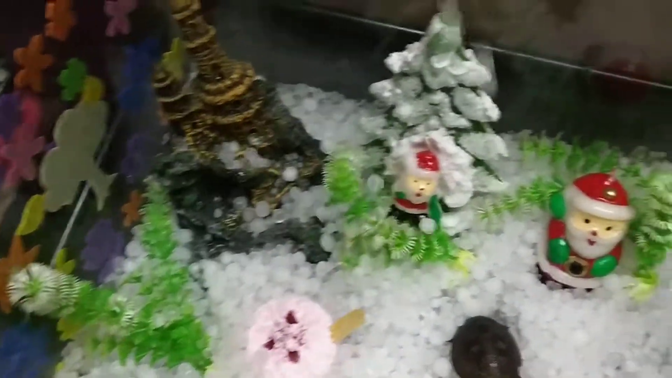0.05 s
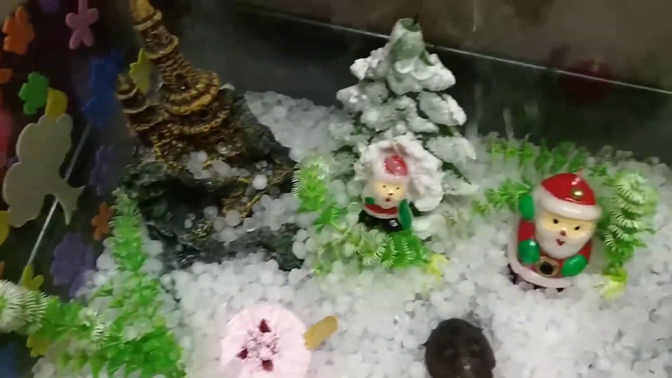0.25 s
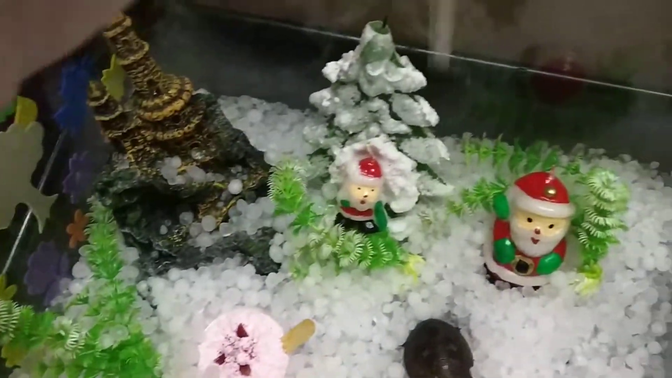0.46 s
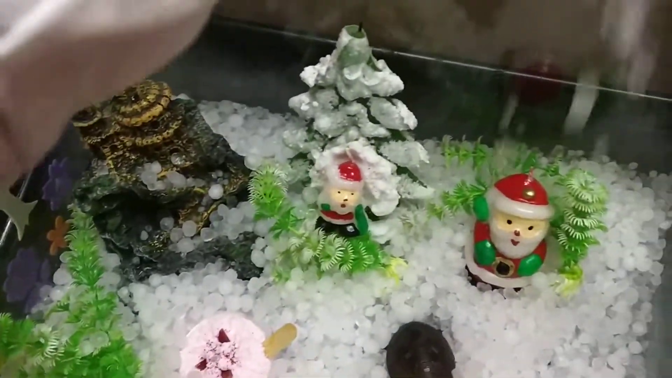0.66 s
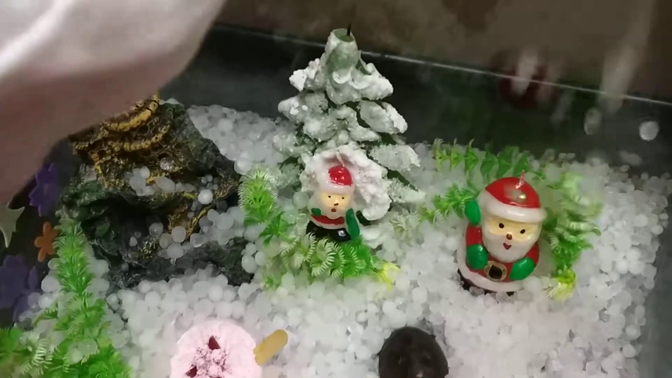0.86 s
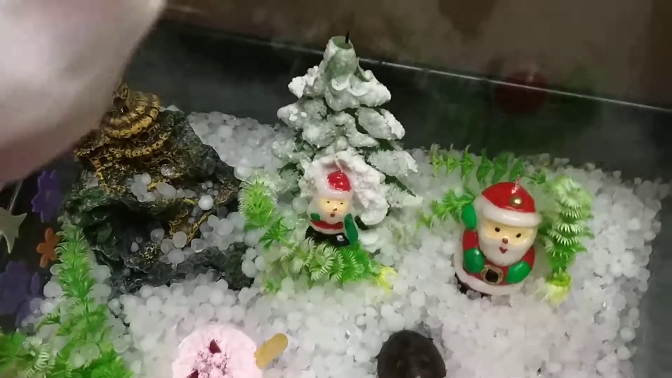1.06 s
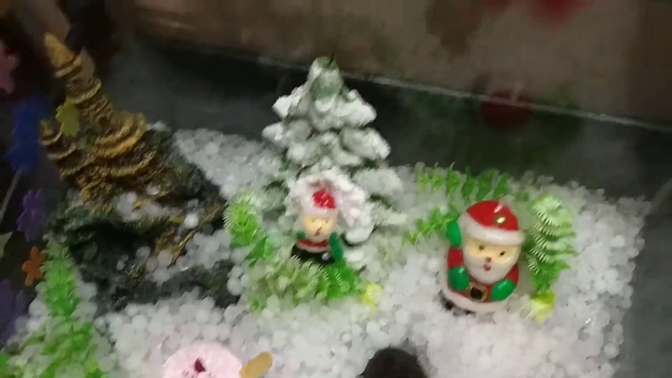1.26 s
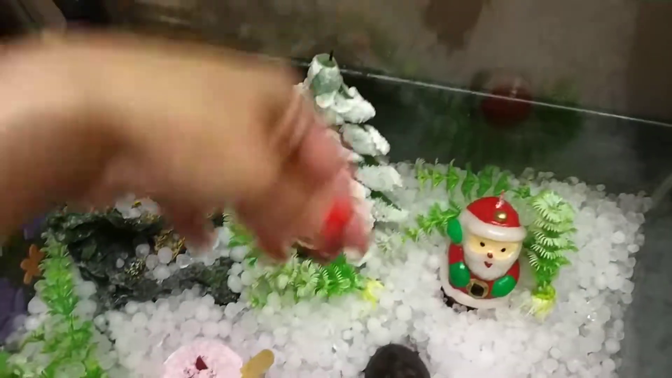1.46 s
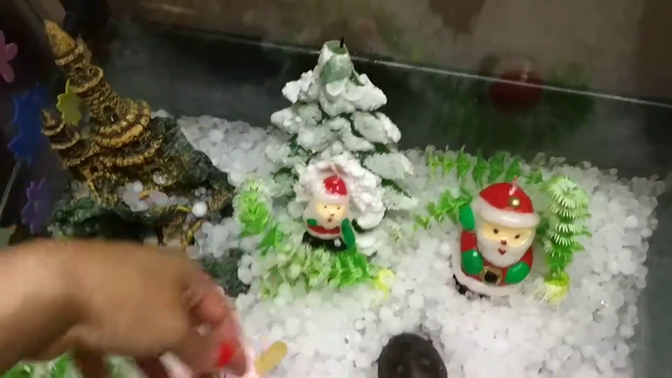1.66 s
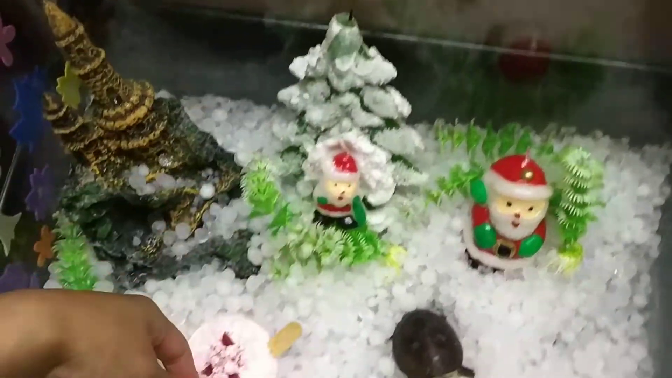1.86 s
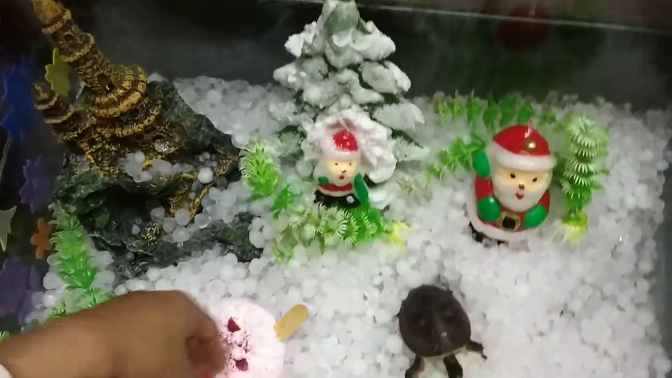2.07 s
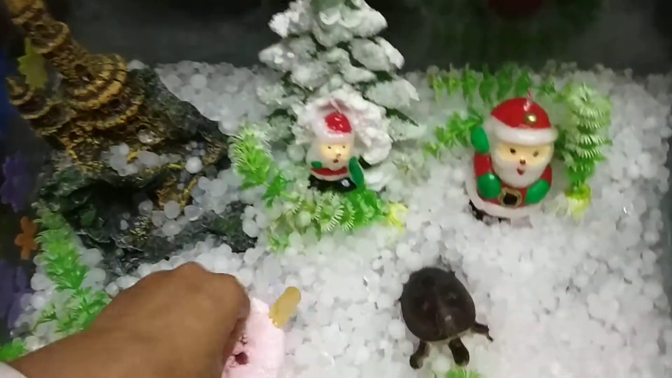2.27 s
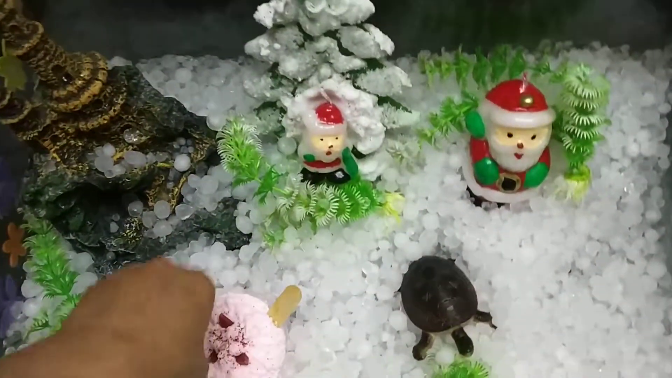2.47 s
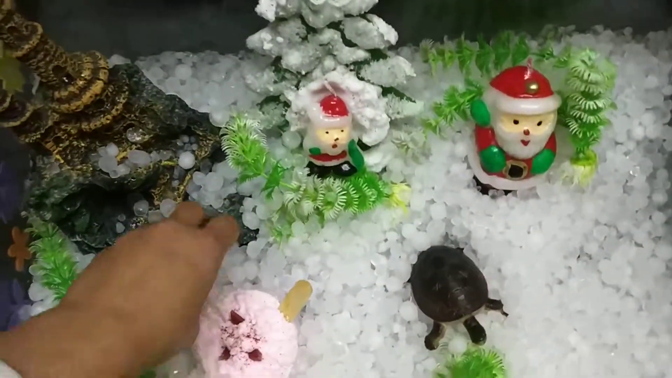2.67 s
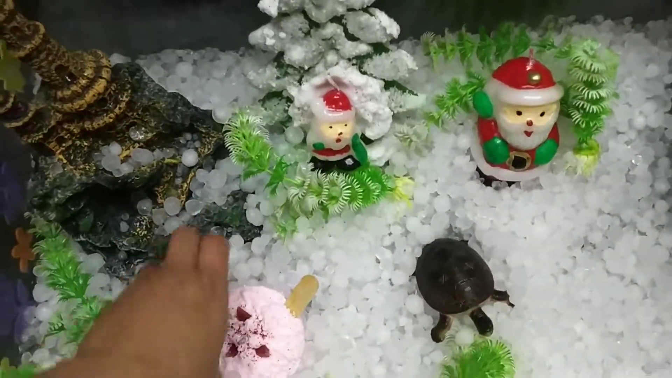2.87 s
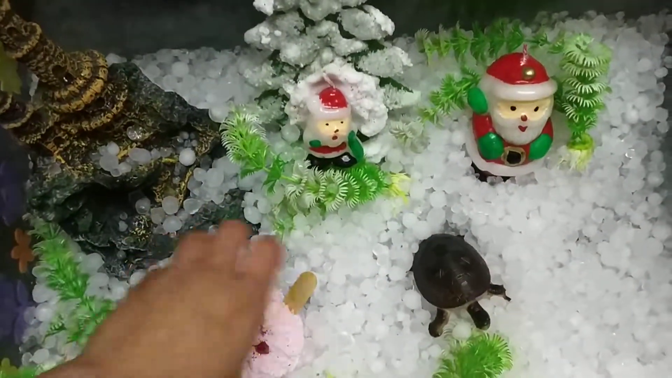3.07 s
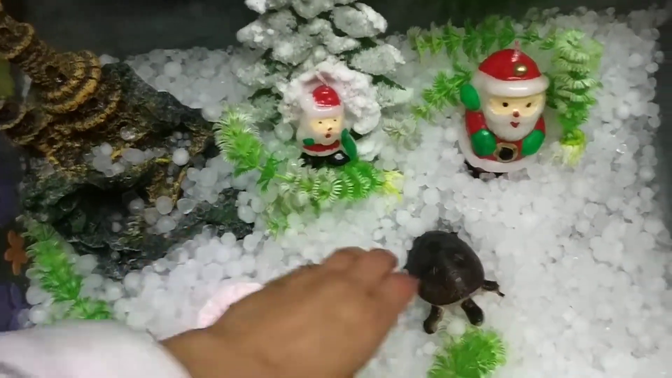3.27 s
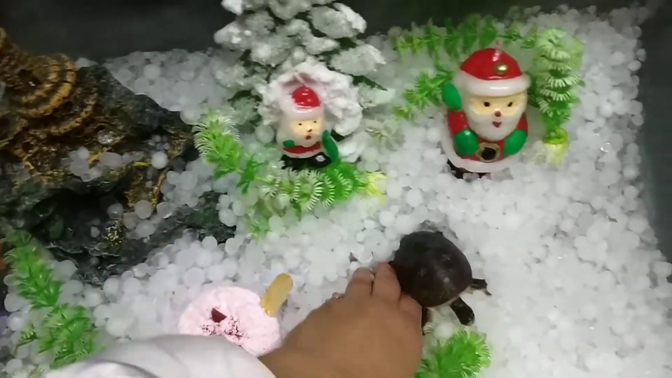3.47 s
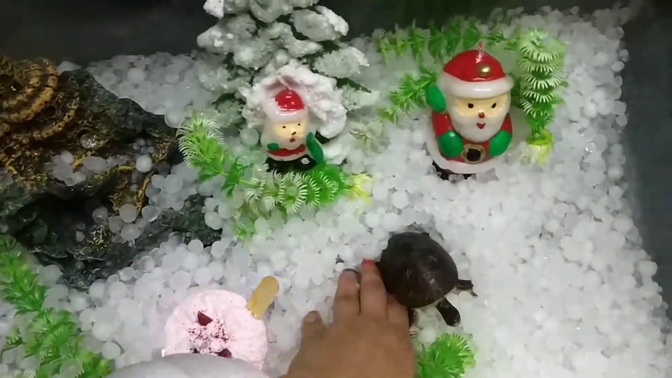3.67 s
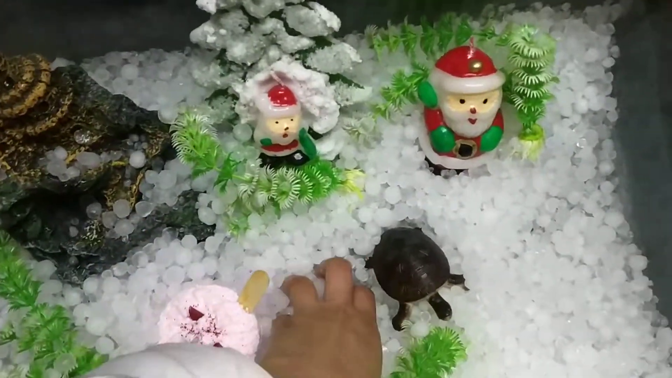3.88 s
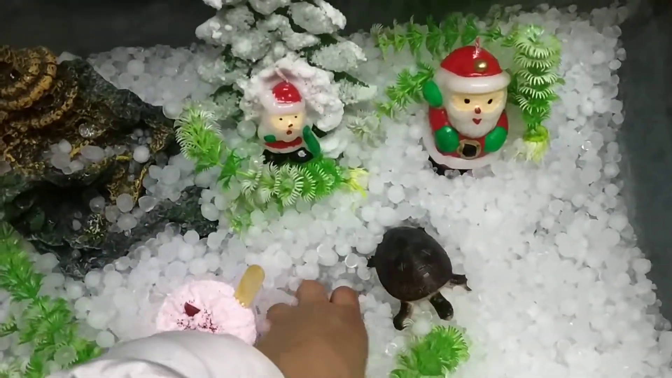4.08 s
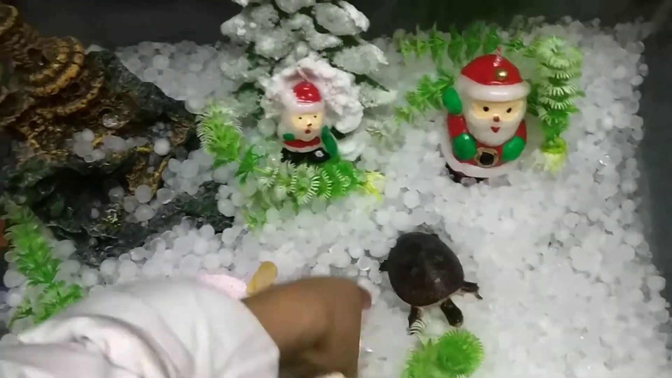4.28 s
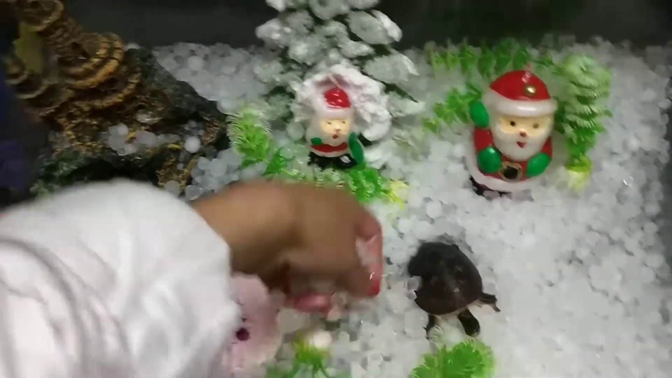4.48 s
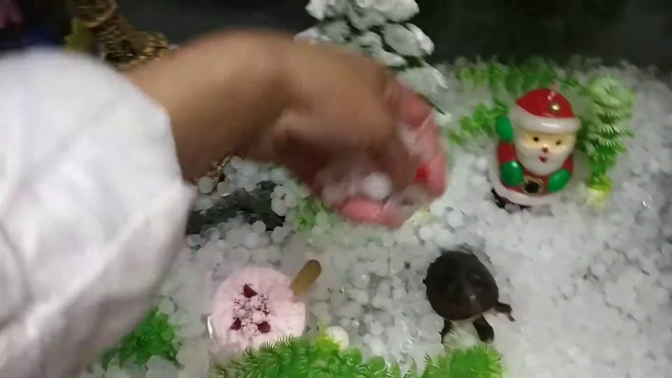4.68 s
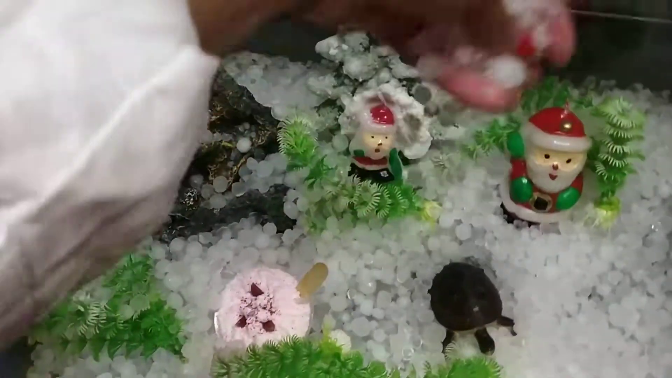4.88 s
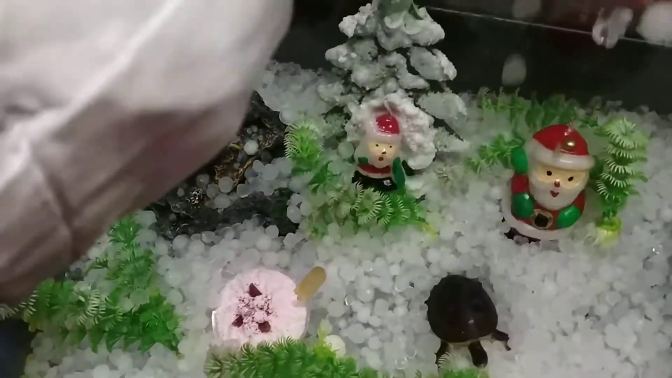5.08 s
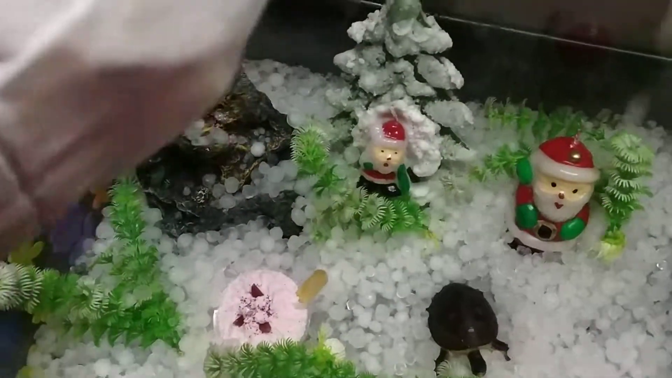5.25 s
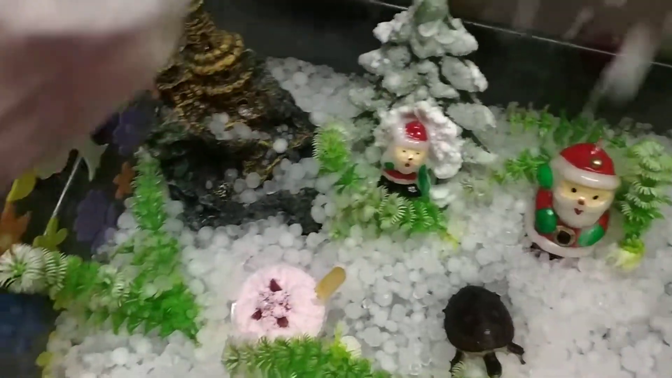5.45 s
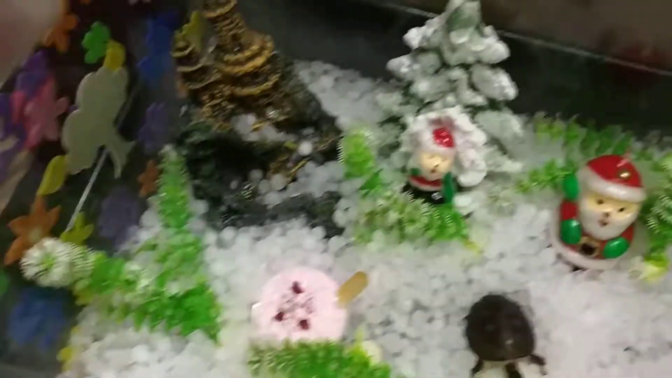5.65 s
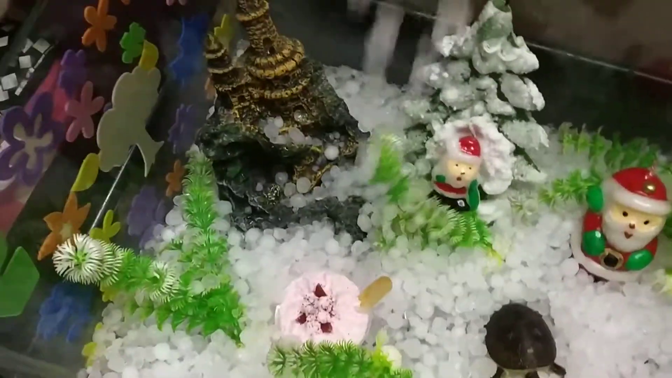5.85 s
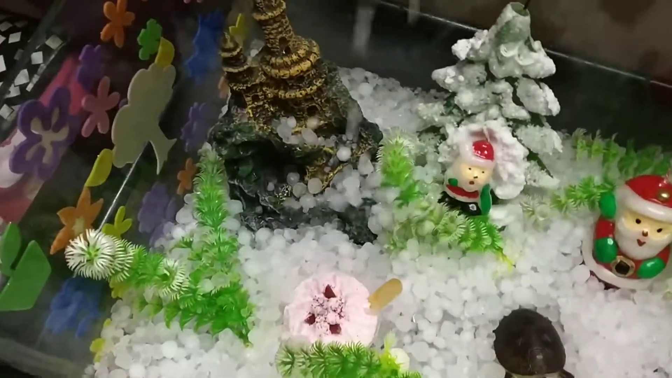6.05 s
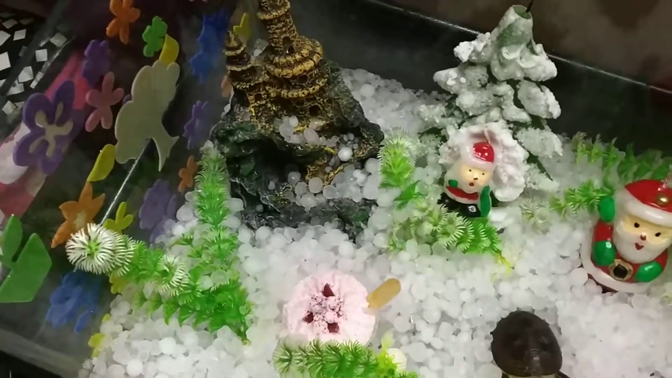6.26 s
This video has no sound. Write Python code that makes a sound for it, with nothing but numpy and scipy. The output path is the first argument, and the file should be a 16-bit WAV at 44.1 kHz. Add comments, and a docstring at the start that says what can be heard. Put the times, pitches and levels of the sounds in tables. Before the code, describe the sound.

A hand drops ice-like pellets over a heap with hard ornaments in a tank. Sharp ticks, tiny rattles and a brief ringing clink come first, then sparse clicks and a quiet gap over low rumbling air. Next comes a thick gritty scoop, followed by a lively shower of pellets with dull knocks. The sound is close, bright, stereo leaning left, with short glassy reflections and a small room around.

```python
"""Hailstones in a glass tank indoors: a hand scoops them up and lets them trickle back onto the pile.
Single pellets are short noise cracks with brief rings, heard through the ice and the tank's resonances.
The pushed pile crunches as countless random noise grains and tiny rings; the tank floor thuds and rings.
One blow on a hard ornament sets decaying sines ringing in a high ping.
The glass walls echo closely, and a low rumble of filtered noise fills the room."""
import sys
import numpy as np
from scipy import signal
from scipy.fft import rfft, irfft, next_fast_len
from scipy.io import wavfile
from scipy.ndimage import uniform_filter1d, map_coordinates

SR = 44100
rng = np.random.default_rng(int(sys.argv[2]) if len(sys.argv) > 2 else 0)


def wav_out(sig):
    """Save sig, one row per channel (or a flat mono array), as 16-bit PCM at SR to the path in sys.argv[1]."""
    wavfile.write(sys.argv[1], SR, np.round(np.clip(np.atleast_2d(sig).T, -1, 1) * 32767).astype(np.int16))


N = 278712
TOP_HZ = 16000  # upper limit of the sound


def amp(db):
    """Decibels to gain."""
    return 10 ** (np.asarray(db) / 20)


def unit(x):
    """Scale to rms 1."""
    return x / np.sqrt(np.mean(x ** 2) + 1e-20)


def along(points, hz):
    """Read (Hz, value) points on a log frequency axis."""
    f, v = np.transpose(points)
    return np.interp(np.log(hz + 1), np.log(f + 1), v)


def curves(rows):
    """One value per sample for each column after the time."""
    times, *columns = np.transpose(rows)
    return [np.interp(np.arange(N) / SR, times, column) for column in columns]


def wobble(rate):
    """A smooth random curve with rate knots a second."""
    knots = rng.standard_normal(int(N * rate / SR) + 4)
    return map_coordinates(knots, [np.arange(N) * rate / SR])


def slope(points):
    """Gain against frequency from (Hz, dB) points."""
    return lambda hz: amp(along(points, hz))


def peaks(modes):
    """Gain against frequency of resonances (Hz, width Hz, dB) that add in power."""
    def gain(hz):
        power = 0
        for center, width, db in modes:
            damping = (hz * width) ** 2
            power = power + amp(db) ** 2 * damping / ((center ** 2 - hz ** 2) ** 2 + damping)
        return np.sqrt(power)
    return gain


def colour(x, gain):
    """Causal minimum-phase filter that keeps the power of white noise."""
    m = 2 * next_fast_len((N + SR // 4) // 2)
    response = unit(gain(np.fft.rfftfreq(m, 1 / SR)))
    cepstrum = irfft(np.log(np.maximum(response, 1e-6)))
    # folding the cepstrum forward in time makes the filter causal
    cepstrum[1:m // 2] *= 2
    cepstrum[m // 2 + 1:] = 0
    return irfft(rfft(x, m) * np.exp(rfft(cepstrum)), m)[..., :N]


def pan(db):
    """Left and right gains of mean power 1, the left higher by db."""
    return unit(amp([[db / 2], [-db / 2]]))


def blend(pair, alike):
    """Turn two unrelated channels into partly alike ones."""
    turn = np.arccos(np.clip(alike, -1, 1)) / 2
    return np.cos(turn) * pair[0] + np.sin(turn) * np.array([pair[1], -pair[1]])


def add(track, s, sound):
    """Mix a sound into a track at time s."""
    start = int(np.clip(round(s * SR), 0, N - 1))
    track[:, start:start + sound.shape[1]] += sound[:, :N - start]


# swell of the background, shared by drone, rush and hiss: (t/s, level/dB)
RUMBLE_SWELL = [(0, -33.5), (.25, -32), (.7, -33), (1.1, -36.5), (1.5, -31.5), (1.8, -31.5), (2.2, -32.5),
                (2.4, -35.5), (2.6, -35.5), (3.05, -38.5), (3.4, -47.5), (4.8, -52.5), (6.3, -54.5)]
# level of a higher band of the rumble: (t/s, level/dB)
UPPER_SWELL = [(0, -44), (.2, -47.5), (.5, -64), (1.2, -65), (1.5, -49), (1.9, -42.5), (2.3, -55),
               (3.2, -78)]
# that band's resonance: (f/Hz, width/Hz, level/dB)
UPPER_RESONANCE = [(357, 115, 0)]
# spectrum of the low drone: (f/Hz, relative level/dB)
DRONE_COLOUR = [(20, -81), (45, -51), (80, -32), (100, -18), (120, -11.5), (190, -4.5), (235, 1.5),
                (290, -6), (325, -10.5), (395, -5), (450, -21.5), (540, -8.5), (700, -26), (1500, -50)]
# standing waves of the room: (f/Hz, width/Hz, relative level/dB)
STANDING_WAVES = [(153.3, 7.5, -3), (218.4, 6, -1.5), (237.4, 6, 1), (279, 15, -0.5), (376, 43, -41)]
# spectrum of a dull rush: (f/Hz, relative level/dB)
RUSH_COLOUR = [(410, -22), (700, -6.5), (970, 3), (1280, -18.5), (1700, -13), (2210, -35), (3740, -120)]
# spectrum of a faint hiss: (f/Hz, relative level/dB)
HISS_COLOUR = [(1180, -11), (2000, -5.5), (3800, -0.5), (4250, -6.5), (4550, -8), (7290, -2.5),
               (15500, -19)]
# spectrum of the steady room tone: (f/Hz, relative level/dB)
ROOM_TONE_COLOUR = [(25, -44), (64, -17.5), (92, -21), (130, -1.5), (155, -13), (172, 5), (215, -9),
                    (300, -3), (450, -3.5), (900, -13.5), (2000, -23)]
HISS_DB, RUSH_DB, HISS_SIDE_DB = -9.5, -26.5, 6  # against the swell; left over right


def rumble():
    """A low, hissing noise swells and fades over steady room tone, ringing the room's standing waves."""
    level_db, = curves(RUMBLE_SWELL)
    upper_db, = curves(UPPER_SWELL)

    def air(gain):
        return colour(blend(rng.standard_normal((2, N)), 0.85), gain)

    def drone(hz):
        return np.hypot(unit(slope(DRONE_COLOUR)(hz)), amp(-2.5) * unit(peaks(STANDING_WAVES)(hz) ** 2))

    swell = amp(-6.5) * air(drone) + amp(RUSH_DB) * air(slope(RUSH_COLOUR))
    hiss = amp(HISS_DB) * pan(HISS_SIDE_DB) * colour(rng.standard_normal((2, N)), slope(HISS_COLOUR))
    upper = amp(upper_db) * air(lambda hz: peaks(UPPER_RESONANCE)(hz) ** 2)
    room_tone = amp(-52.5) * air(slope(ROOM_TONE_COLOUR))
    return amp(level_db) * (swell + hiss) + upper + room_tone


SLIDE_RISE_S, SETTLE_DB_PER_S = .024, 220


def motion(t, start, end):
    """The pile gives way quickly, keeps moving until the end, then settles; a gain."""
    rise = np.clip((t - start) / SLIDE_RISE_S + .5, 0, 1)
    return rise * amp(-SETTLE_DB_PER_S * np.maximum(t - end, 0))


# short slides of the pile, under the fingers or the falling pellets:
# (t/s, length/s, fine crunch level/dB, coarse crunch level/dB, tank level/dB, swell/dB per s)
PILE_SLIDES = [(0, 0.082, -36, -40.5, -49.5, 3.5), (0.13, 0.07, -36, -40.5, -52, -24),
               (0.274, 0.084, -25, -31.5, -48, -75), (0.368, 0.07, -31.5, -37.5, -52, -26),
               (0.452, 0.24, -37.5, -44, -69, -42), (0.708, 0.11, -33.5, -40, -52, -16.5),
               (.912, 0.07, -38, -43, -57, 21), (1.02, .06, -35, -41.5, -54, 0),
               (1.135, .12, -34, -44.5, -55, 0), (1.356, 0.057, -33, -42, -55, -120),
               (1.494, 0.014, -31.5, -53, -55, -13.5), (1.622, 0.02, -36.5, -49, -60, -6.5),
               (2.093, 0.14, -48.5, -61, -62, 41), (2.244, 0.054, -33.5, -45, -57, 120.5),
               (2.35, 0.11, -35, -43.5, -52.5, -47), (2.481, 0.082, -45.5, -45.5, -57, -2),
               (2.593, .11, -31, -39.5, -48, -30), (2.787, 0.014, -38, -45.5, -55, -11),
               (2.879, 0.095, -36, -44.5, -49, -23), (3.182, 0.24, -48, -53, -62, 52.5),
               (3.439, 0.021, -23, -34.5, -44.5, -3), (3.498, 0.18, -33, -43, -47.5, -29.5),
               (4.801, 0.067, -42.5, -47.5, -60, 2), (4.875, 0.039, -30, -38, -58.5, -13),
               (4.958, 0.082, -38, -46, -68.5, 5.5), (5.035, 0.16, -33.5, -43, -60, -52.5),
               (5.236, 0.054, -34, -41.5, -54.5, -2), (5.35, 0.038, -35.5, -43, -55, 2),
               (5.427, 0.086, -33, -44.5, -51.5, -20), (5.538, 0.046, -34.5, -45.5, -53, 0),
               (5.611, 0.12, -27.5, -38.5, -50.5, -56.5), (5.749, 0.1, -36.5, -43, -56, -18.5),
               (5.891, 0.11, -33, -43, -51, 31.5), (6.018, 0.048, -27, -33, -45.5, -31),
               (6.094, 0.14, -33, -43, -50.5, -12), (6.257, 0.046, -31, -37, -49.5, -100)]
# the hand digs in and closes on a handful: (t/s, fine crunch level/dB, coarse crunch level/dB)
HAND_SCOOP = [(3.72, -43.5, -46), (3.749, -35, -42.5), (3.765, -22, -39), (3.83, -22, -38),
              (3.87, -26.5, -39), (3.965, -24, -36), (4.01, -18, -30), (4.09, -23, -29.5), (4.12, -19, -28),
              (4.22, -21.5, -28.5), (4.299, -27, -37), (4.34, -23.5, -37), (4.5, -25.5, -37),
              (4.58, -23.5, -36), (4.651, -33, -45), (4.73, -30.5, -41), (4.802, -40, -49.5)]
SCOOP_TANK_DB, SCOOP_THUD_DB = -11.5, -9.5  # tank walls and floor against the coarse crunch
THUD_DB = -1  # in a slide, the tank floor against its walls
# around each landing, smaller pellets arrive just before and the heap stirs just after
STIR_DB, STIR_LEAD_S, STIR_LIFE_S = -20.5, .006, .007
STEP_S = .001  # time grid of the levels


def stirring():
    """Levels in dB of fine crunch, coarse crunch, tank walls and floor: all causes add in power."""
    t = np.arange(0, N / SR, STEP_S)
    times, *columns = np.transpose(HAND_SCOOP)
    fine_db, coarse_db = (np.interp(t, times, column) for column in columns)
    scoop = amp([fine_db, coarse_db, coarse_db + SCOOP_TANK_DB, coarse_db + SCOOP_THUD_DB])
    power = (scoop * motion(t, times[0], times[-1])) ** 2
    for start, length, fine_db, coarse_db, tank_db, swell in PILE_SLIDES:
        shape = motion(t, start, start + length) * amp(swell * np.clip(t - start, 0, length))
        power += np.outer(amp([fine_db, coarse_db, tank_db, tank_db + THUD_DB]), shape) ** 2
    # landings stir everything but the floor
    for s, tick_db, clack_db, knock_db, _ in LANDINGS:
        distance = np.maximum((s - t) / STIR_LEAD_S, (t - s) / STIR_LIFE_S)
        shape = amp(STIR_DB) * np.exp(-distance)
        power[:-1] += np.outer(amp([tick_db, clack_db, knock_db]), shape) ** 2
    levels_db = 10 * np.log10(power + 1e-12)
    return curves(np.column_stack([t, *levels_db]))


def grains(rate, spread_db, life, smooth):
    """Countless tiny slips at a rate a second, blurred by scattering in the heap."""
    sizes = amp(2 * spread_db * np.clip(rng.standard_normal(N), -2, 2))  # power of each slip
    slips = (rng.random(N) < rate / SR) * sizes / rate
    power = signal.lfilter([1], [1, -np.exp(-1 / (life * SR))], slips)
    share = np.clip(smooth, 0, 1)  # part of the power that is steady noise
    return np.sqrt(share + (1 - share) * power / power.mean()) * rng.standard_normal((2, N))


def rattle(rate, pitch_hz, cycles, spread_db):
    """Small pellets jostle, each ringing for a few cycles at its own pitch; rms 1."""
    start = np.flatnonzero(rng.random(N) < rate / SR)
    draws = np.clip(rng.standard_normal((len(start), 4)), -2, 2)
    pitch, size, side, phase = draws.T[:, :, None]
    k = np.arange(SR // 150)
    turns = np.minimum(pitch_hz * np.exp(.3 * pitch), TOP_HZ) * k / SR
    ring = amp(spread_db * size) * np.exp(-turns / cycles) / np.sqrt(rate[start, None])
    where = (start[:, None] + k).ravel()
    ears = []
    for sign in (1, -1):
        ear = ring * amp(sign * side) * np.sin(2 * np.pi * turns + sign * phase)
        ears.append(np.bincount(where, ear.ravel(), N)[:N])
    return unit(np.array(ears))


def pile(fine_db, coarse_db, tank_db):
    """The harder the pile is pushed, the more pellets slip and jostle; at rest a soft hiss remains."""
    rate = 450 * amp(.7 * (fine_db + 32)) + 300  # slips per second
    moving = np.clip((fine_db + 42) / 12, .03, 1)  # share of the power that is gritty
    crunch = grains(rate, spread_db=4, life=.0015, smooth=.5) * amp(.8 * wobble(45))
    small = rattle(rate, pitch_hz=9000, cycles=13, spread_db=4)
    large = rattle(rate, pitch_hz=3200, cycles=6, spread_db=3.5)

    def stirred(grit):
        return np.sqrt(moving) * unit(grit) + np.sqrt(1 - moving) * rng.standard_normal((2, N))

    fine = amp(fine_db) * stirred(crunch + 0.43 * small)
    coarse = amp(coarse_db) * stirred(crunch + 0.53 * large)
    tank = amp(tank_db) * stirred(crunch)
    return fine * pan(7.3), coarse * pan(6.3), tank


# small pellets spill from the hand at random: (start t/s, end t/s, typical tick level/dB)
HAND_SPILLS = [(0, .25, -39), (.3, .44, -34), (.88, 1, -40), (1.03, 1.27, -39), (2.27, 2.44, -38),
               (3.77, 4.3, -27), (4.3, 4.65, -29), (5.45, 5.7, -38), (5.9, 6.3, -38)]
SPILL_PER_S, SPILL_SPREAD_DB = 50, 2.5  # spread is a standard deviation
SPILL_CLACK_DB, SPILL_KNOCK_DB, SPILL_SIDE_DB = -13.5, -19.5, 17  # first two against the tick; left over right


def spilled():
    """Rows like those of LANDINGS for the small pellets, which fall at uneven intervals."""
    rows = []
    for start, end, db in HAND_SPILLS:
        draws = rng.random((40, 5))[:max(1, round((end - start) * SPILL_PER_S))]
        for k, (delay, *chance) in enumerate(draws):
            size, clack, knock, side = SPILL_SPREAD_DB * np.sqrt(12) * (np.array(chance) - .5)
            s = start + (k + delay) / SPILL_PER_S
            tick = db + size
            rows.append((s, tick, tick + SPILL_CLACK_DB + clack,
                         tick + SPILL_KNOCK_DB + knock, SPILL_SIDE_DB + side))
    return rows


# a free fall clicks brighter than the sliding heap: (f/Hz, relative level/dB)
FREE_FALL_TONE = [(1000, 0), (2400, 1), (3700, -2.5), (5300, 1), (7500, -1), (12000, -.5), (15000, 2)]
LEAD = .003  # silence kept ahead of each blow (s)


def contact(t, t60, tail_db, tail_t60, tint_db, nudge_db, ring_db, ring_t60, span=0.0033, count=3):
    """A sharp crack, nudged neighbours and a brief ring in the pellet's own colour; rms 1 over span (s)."""
    def crack(age):
        decay = amp(-60 * np.abs(age) / t60)
        return (age > 0) * decay * (1 - np.exp(-np.abs(age) / .00025))

    age = t - LEAD
    shape = crack(age) + (age > 0) * amp(tail_db - 60 * age / tail_t60)
    # neighbours are struck just after the blow
    for delay in rng.uniform(0.0031, 0.009, count):
        shape = np.hypot(shape, amp(nudge_db + 2 * rng.standard_normal()) * crack(age - delay))
    spectrum = rfft(rng.standard_normal((2, len(t))) * shape)
    # every blow delivers an even share of energy to each part of the spectrum
    energy = np.mean(np.abs(spectrum) ** 2, axis=0)
    spectrum /= np.sqrt(np.abs(uniform_filter1d(energy, size=130)))
    # the struck pellets ring briefly, each at its own pitch
    pitches = rng.uniform(2500, 14500, (count, 1))
    ring = (age > 0) * amp(-60 * age / ring_t60) * np.sin(2 * np.pi * pitches * age).sum(axis=0)
    spectrum += amp(ring_db) * rfft(ring / np.linalg.norm(ring))
    # size and seat give each pellet its own humps in the treble
    height = np.linspace(0, 1, spectrum.shape[1])
    hz = height * SR / 2
    tint = map_coordinates(rng.standard_normal(40), [39 * height]) * np.minimum(3 * height, 1)
    tone = amp(tint_db * tint + along(FREE_FALL_TONE, hz))
    burst = irfft(spectrum * tone * (hz < TOP_HZ), len(t))
    return burst * np.sqrt(2 * span * SR / np.sum(burst ** 2))


# the clearest landings:
# (t/s, tick level/dB, clack level/dB, tank knock level/dB, left over right/dB)
LANDINGS = [(0.0112, -16.5, -21, -31, 6), (.018, -16.5, -22, -33, 3), (.055, -36, -22, -28.5, 10),
            (0.0614, -20, -38, -41, 7), (0.113, -31, -34, -49, 8), (0.1274, -25, -48, -44, 11),
            (0.1352, -17, -24.5, -36, 5), (0.146, -30, -20, -45, 9), (0.16, -29, -40, -50, 6),
            (0.164, -39, -21.5, -32, 2), (0.2157, -19, -25.5, -36, 5), (0.2188, -24.5, -38, -40, 7),
            (0.238, -23.5, -22.5, -55, 5), (0.2417, -20.5, -27, -50, 10), (0.2728, -17, -26, -41, -13),
            (0.2797, -15.5, -22, -31, 7), (.2865, -23, -19, -47, 1), (.297, -19, -30, -50, 4),
            (0.328, -25, -22.5, -37, -19), (.411, -30, -42, -54, 9), (0.4161, -26, -40, -57, 10),
            (0.4327, -33.5, -32, -54, 6.5), (0.443, -25, -35, -59, 10), (0.4603, -25.5, -48, -59, 7),
            (0.5191, -34, -46, -62, 11), (.612, -30, -38, -60, 10), (0.629, -41, -36, -53, 6),
            (0.6331, -15, -29, -44, 7), (0.713, -34, -37, -49, 11), (0.7334, -25, -46, -54, 9),
            (.75, -16, -19.5, -30.5, 7), (0.8033, -42, -32, -54, 13), (0.8264, -32, -36.5, -37, 9),
            (.8298, -18, -24, -34, 6), (.886, -21, -33, -45, 9), (0.8923, -30, -32, -44, 4),
            (.91, -31, -40, -51, 12), (0.9277, -25, -44, -57, 10), (0.9398, -34, -45, -63, 10),
            (0.9534, -19.5, -31, -41.5, 8), (0.9712, -19, -28, -34.5, 2), (.986, -26, -42, -54.5, 7),
            (1.017, -14.5, -24.5, -36, 2), (1.0275, -24, -31, -42, 1), (1.0404, -21, -29, -38, 2),
            (1.0691, -34, -42, -57, 6), (1.0807, -25, -34, -42, 6), (1.084, -33, -31, -45, 6),
            (1.092, -17.5, -30, -59.5, 0), (1.102, -19, -41, -59, 1), (1.1106, -37, -39, -45, 5),
            (1.12, -32, -44, -58, 6), (1.1266, -18, -28, -46, 6), (1.172, -30, -44, -56.5, 9),
            (1.1875, -32, -35, -50, 8), (1.2433, -29.5, -34, -55, 8), (1.259, -29.5, -36, -50.5, 9),
            (1.3503, -18, -18.5, -40, 4), (1.355, -20, -23, -47.5, 2), (1.3625, -26, -35, -54, -.5),
            (1.3788, -25, -48, -64, 7), (1.443, -31.5, -40, -49, 6.5), (1.5007, -29, -46, -58, 19),
            (1.519, -27, -45, -63, 12), (1.5354, -24.5, -36, -55, 12), (1.561, -38, -46, -59.5, 9),
            (1.63, -30, -38, -54, 9), (1.637, -29.5, -46, -49, 10), (2.246, -20.5, -44.5, -57, 11),
            (2.2766, -25, -35, -55, 15), (2.287, -29, -29, -45, 12), (2.303, -24.5, -31, -41, 12.5),
            (2.374, -30, -46, -58, 12), (2.4089, -30, -45.5, -57, 11), (2.465, -30, -34, -62.5, 18),
            (2.5, -36, -34, -59, 15), (2.509, -41, -39, -60, 15), (2.516, -35, -32, -59, 18),
            (2.538, -33, -45, -61, 12), (2.552, -33, -48, -62, 12), (2.577, -37, -50, -62, 12),
            (2.5908, -24, -36, -39.5, 6), (2.6, -28.5, -34, -50, 12), (2.634, -28, -46, -32, 15.5),
            (2.646, -33, -38, -47, 13), (2.652, -32, -28, -39, 16), (2.668, -42, -38, -47, 12),
            (2.684, -31.5, -37, -47, 12), (2.697, -33, -36, -45, 14), (3.4575, -29, -32, -48, 7.5),
            (3.5058, -28.5, -45.5, -59.5, 10.5), (3.578, -43.5, -36.5, -48, 7.5),
            (3.616, -32.5, -44, -61, 16), (3.6202, -38, -48, -56.5, 12), (3.718, -32.5, -44, -64, 14),
            (3.772, -27, -40.5, -50, 10.5), (3.795, -22.5, -44.5, -50, 6), (3.816, -27, -42, -42, 9),
            (3.829, -32, -45, -48, 8), (3.931, -25, -40, -43.5, 8), (4.048, -20, -21, -42, 2),
            (4.18, -18, -26, -33, 8), (4.289, -30, -32, -47, 7), (4.4707, -23, -34, -50, 6.5),
            (4.4854, -28, -24, -46, 4), (4.5215, -35, -27, -51.5, 5.5), (4.534, -35, -26, -50, 5),
            (4.565, -22.5, -28, -48, 2), (4.578, -19, -39, -44, 11.5), (4.59, -25, -45, -46, 13),
            (4.618, -28, -45, -49, 7), (4.6386, -39, -36, -52, 7.5), (4.6897, -34.5, -35, -57, 8.5),
            (4.7052, -23.5, -26.5, -43, 17), (4.737, -22, -24, -37, 6), (4.758, -25, -49.5, -51.5, 8),
            (4.809, -30, -41, -49, 13), (4.8332, -28.5, -42, -65, 10.5), (4.937, -17.5, -32, -47.5, 7.5),
            (5.024, -27, -35, -49, 14), (5.0297, -19, -40, -49, 9.5), (5.0594, -19, -28.5, -49.5, 8),
            (5.0644, -24, -37.5, -55, 11), (5.0738, -26, -35, -67, 7), (5.1, -28, -53, -70, 11),
            (5.1048, -27.5, -46, -62, 11), (5.116, -29, -53, -58, 9.5), (5.135, -21, -34.5, -47.5, 2),
            (5.143, -27, -42, -60, 2.5), (5.164, -31, -50, -64, 8.5), (5.176, -27.5, -57, -60.5, 16),
            (5.1942, -24, -36.5, -62, 10), (5.2248, -25.5, -34.5, -39.5, 9.5), (5.2401, -21.5, -33, -60, 7),
            (5.254, -19, -36, -51, 6.5), (5.259, -20.5, -39, -52, 10.5), (5.266, -22, -43, -54, 5),
            (5.2722, -21.5, -28, -52.5, 11), (5.312, -32, -48, -62, 8), (5.327, -18, -33.5, -49, 4),
            (5.345, -16, -30, -36.5, 6), (5.38, -23, -33.5, -45, 13), (5.3912, -27, -33, -50, 3),
            (5.416, -23.5, -35, -50.5, 15), (5.432, -26, -35, -47, 5), (5.436, -16, -23, -38, 3),
            (5.4564, -26.5, -44, -57, 4), (5.4706, -33, -53.5, -64, 6), (5.4835, -19.5, -34, -37, 5.5),
            (5.5257, -25, -30.5, -53, 11), (5.5365, -24, -23.5, -30.5, 7), (5.545, -22.5, -32.5, -50, 12),
            (5.5507, -23.5, -30, -53, 6), (5.569, -27, -35, -52, 6.5), (5.5768, -24.5, -46, -55, 9),
            (5.592, -27, -44, -61, 9), (5.6, -33, -49, -59, 8), (5.6121, -17, -23.5, -42, 2),
            (5.626, -22, -33, -50, 5), (5.638, -20, -30, -44, 2), (5.6646, -25.5, -41.5, -59.5, 6.5),
            (5.688, -31.5, -31.5, -50, 7), (5.734, -29.5, -43.5, -72, 15.5),
            (5.744, -27.5, -16.5, -33.5, 3), (5.76, -30, -21, -34, 7), (5.765, -34, -35, -42, 11),
            (5.795, -34, -36, -61.5, 9), (5.8024, -25, -41.5, -64.5, 7), (5.83, -26.5, -44, -61, 10),
            (5.8484, -25.5, -49, -65.5, 7), (5.8542, -27.5, -51, -64, 9), (5.8666, -32, -37, -63, 9),
            (5.8758, -24, -40, -44, 13), (5.887, -31, -35, -56, 8), (5.8934, -15.5, -27, -39, 5),
            (5.9, -19, -33, -37, 14), (5.907, -24, -22.5, -44, 7), (5.9207, -20, -32, -57, 6),
            (5.9323, -21, -38.5, -50, 9), (5.9357, -23, -12, -23, -3), (5.9806, -24, -30, -30.5, -20),
            (5.9932, -27, -38, -50, 2.5), (6.0136, -15.5, -26.5, -32, 5), (6.0166, -24.5, -19.5, -27.5, 5),
            (6.028, -16, -18, -27.5, 3), (6.0533, -21, -26, -32, -4), (6.0721, -23, -25.5, -34, -3),
            (6.1021, -22, -35.5, -49, 0), (6.14, -35, -36, -54.5, 6.5), (6.1455, -20, -26.5, -39, 8.5),
            (6.1558, -22.5, -26.5, -39, 10.5), (6.17, -34, -31.5, -50, 9), (6.192, -19, -23.5, -39, 3),
            (6.1975, -23, -29, -43, 4), (6.215, -31.5, -34, -54, 1), (6.268, -25, -36.5, -61, 15.5),
            (6.279, -33.5, -35, -61, 8), (6.306, -30, -43.5, -59.5, 8.5)]


def pellets():
    """Each landing drives the fine ice, the coarse ice and the tank with one blow."""
    fine, coarse, tank = np.zeros((3, 2, N))
    t = np.arange(SR // 10) / SR
    for s, tick_db, clack_db, knock_db, side_db in [*LANDINGS, *spilled()]:
        hit = contact(t, t60=rng.uniform(.009, .014), tail_db=-25, tail_t60=.06, tint_db=3.3,
                      nudge_db=-16, ring_db=-11, ring_t60=.022)
        add(fine, s - LEAD, amp(tick_db) * pan(side_db) * hit)
        add(coarse, s - LEAD, amp(clack_db) * pan(side_db) * hit)
        add(tank, s - LEAD, amp(knock_db) * hit)
    return fine, coarse, tank


# spectrum of the fine ice: (f/Hz, relative level/dB)
FINE_ICE = [(100, -80), (2500, -46), (4800, -8.5), (5700, -9), (7000, -2.5), (8600, -0.5), (11500, 0),
            (14000, -3), (15800, -8.5)]
# spectrum of the coarse ice: (f/Hz, relative level/dB)
COARSE_ICE = [(100, -59), (900, -33), (1600, -16.5), (2100, -8.5), (2450, -6.5), (2850, 0), (4000, 2),
              (4900, -5.5), (6500, -5.5), (10000, -36.5)]
# the glass panes ring faintly with the ice: (f/Hz, width/Hz, level against the ice/dB)
GLASS_PANES = [(2132, 30, 3), (2214, 14, 2.5), (2788, 16, 3), (3403, 38, 1), (4109, 16, 5), (5788, 35, 3),
               (6643, 55, 1), (8097, 44, 1), (9229, 40, 0)]


def through_ice(fine, coarse, rub):
    """Small pieces sound bright and large ones duller; the panes add narrow resonances to both."""
    ice = colour(fine, slope(FINE_ICE)) + colour(coarse, slope(COARSE_ICE)) + rub
    return colour(ice, lambda hz: np.hypot(1, peaks(GLASS_PANES)(hz)))


# the tank's resonances: (f/Hz, width/Hz, relative level/dB)
TANK_MODES = [(650, 630, -1.5), (790, 19, 8.5), (964, 124, 6.5), (1091, 29, 11), (1430, 3300, 0),
              (1570, 720, -1)]


def through_tank(blows):
    """The tank's body resonates and radiates only in the middle range."""
    def body(hz):
        return peaks(TANK_MODES)(hz) / np.hypot(1, (hz / 1800) ** 4) / np.hypot(1, (550 / (hz + 1)) ** 2)
    return colour(blend(blows, 0.37), body) * pan(-0.51)


# dull bumps on the tank: (t/s, level/dB)
TANK_BUMPS = [(.145, -25), (0.277, -27), (3.444, -30), (4.125, -34), (4.19, -31.5), (4.52, -34),
              (4.565, -33), (4.59, -34), (5.534, -33.5), (5.745, -36), (5.762, -30), (5.976, -33.5)]
# spectrum of the tank floor: (f/Hz, relative level/dB)
FLOOR_COLOUR = [(25, -68), (60, -46), (110, -33), (160, -24), (280, 1), (400, -4.5), (600, -19),
                (1000, -20.5)]


def thuds(floor_db):
    """The heap passes the hand's weight and heavier bumps to the tank floor."""
    push = amp(floor_db) * grains(np.full(N, 120.), spread_db=5, life=0.009, smooth=0.32)
    t = np.arange(SR // 12) / SR
    for s, db in TANK_BUMPS:
        add(push, s, amp(db - 60 * t / 0.057) * rng.standard_normal((2, len(t))))
    return colour(push[0], slope(FLOOR_COLOUR)) * pan(-2.1)


# modes of a hard ornament struck once: (f/Hz, level/dB, t60/s)
ORNAMENT_MODES = [(7262, -17.5, .41), (7278.5, -21.5, .41), (7420, -21, .05), (7482, -27, .15),
                  (2972, -29, .26), (4531, -29, .16), (6689, -30, .2), (6882, -29, .18), (7082, -29, .18),
                  (8068, -31, .2), (8241, -29, .15), (9054, -30, .2), (9234, -31, .26), (10454, -31, .22),
                  (11440, -26, .18), (12392, -32, .25)]
PING_AT = .274  # s


def ping():
    """One pellet strikes a hard ornament: a bright clink, then a high note whose closest modes beat."""
    t = np.arange(SR) / SR
    ring = sum(amp(db - 60 * t / t60) * np.sin(2 * np.pi * hz * t) for hz, db, t60 in ORNAMENT_MODES)
    onset = 1 - np.exp(-t / .0005)
    track = np.zeros((2, N))
    add(track, PING_AT, pan(2.8) * ring * onset)
    return track


# square hits that ring the tank floor: (t/s, f/Hz, level/dB, t60/s)
FLOOR_RAPS = [(2.635, 926, -29, .026), (2.652, 1080, -32, 0.043), (2.668, 1050, -41, .035),
              (2.682, 1056, -35, 0.043), (2.696, 1050, -40, .04), (5.537, 946, -25, .045),
              (5.685, 942, -37, 0.043), (5.9366, 1108, -26, 0.081), (6.017, 1090, -22, 0.051),
              (6.054, 1020, -27, .035)]


def raps():
    """A square hit sets the tank floor ringing, at a pitch that depends on the spot."""
    track = np.zeros((2, N))
    t = np.arange(SR // 5) / SR
    rise = np.sin(np.pi / 2 * np.minimum(t / .002, 1)) ** 2
    for s, hz, db, t60 in FLOOR_RAPS:
        add(track, s, pan(-1) * rise * amp(db - 60 * t / t60) * np.sin(2 * np.pi * hz * t))
    return track


# resonance of ice dragged on glass: (f/Hz, width/Hz, relative level/dB)
GRIND_RESONANCE = [(2159, 513, 0)]
GRIND_DB, GRIND_GROWS = -31.5, 3.6  # at the hardest push; dB per dB of coarse crunch


def grinding():
    """Only the deepest part of the scoop drags the heap over the glass audibly, as a band of noise."""
    _, push_db = curves(HAND_SCOOP)
    rub = colour(rng.standard_normal((2, N)), lambda hz: peaks(GRIND_RESONANCE)(hz) ** 2)
    return amp(GRIND_DB + GRIND_GROWS * (push_db - push_db.max())) * pan(1.94) * rub


# decay of the room's tail: (f/Hz, t60/s)
ROOM_DECAY = [(300, 0.38), (3000, 0.13), (14000, 0.19)]


def surroundings(x, glass_db, room_db, count=8):
    """Quick echoes from the glass walls, and the room's soft tail of decaying noise."""
    hz, t, z = signal.stft(rng.standard_normal((2, SR // 2)), SR, nperseg=256)
    decay = amp(-60 * t / along(ROOM_DECAY, hz)[:, None])
    tail = signal.istft(z * decay, SR, nperseg=256)[1]
    answer = amp(room_db) * tail / np.linalg.norm(tail[0])
    for channel in answer:
        delays = rng.uniform(.003, 0.013, count)
        echoes = amp(glass_db) * rng.standard_normal(count) / np.sqrt(count)
        channel[(delays * SR).astype(int)] += echoes
    return x + signal.fftconvolve(x, answer, axes=1)[:, :N]


def scene():
    """Landings and slips sound through the same ice and the same tank."""
    fine_db, coarse_db, tank_db, floor_db = stirring()
    fine, coarse, tank = np.array(pile(fine_db, coarse_db, tank_db)) + np.array(pellets())
    ice = through_ice(fine, coarse, grinding())
    knocks = through_tank(tank)
    near = ice + knocks + thuds(floor_db) + raps() + ping()
    return surroundings(near, glass_db=-16, room_db=-17) + rumble()


def record(dry):
    """Soft saturation rounds off the highest peaks; nothing above the band limit is kept."""
    rounded = dry / (1 + (dry / .8) ** 4) ** (1 / 4)
    m = next_fast_len(N + SR // 4)
    keep = np.fft.rfftfreq(m, 1 / SR) < TOP_HZ
    return irfft(rfft(rounded, m) * keep, m)[:, :N]


dry = scene()
out = record(dry)
wav_out(out)
```